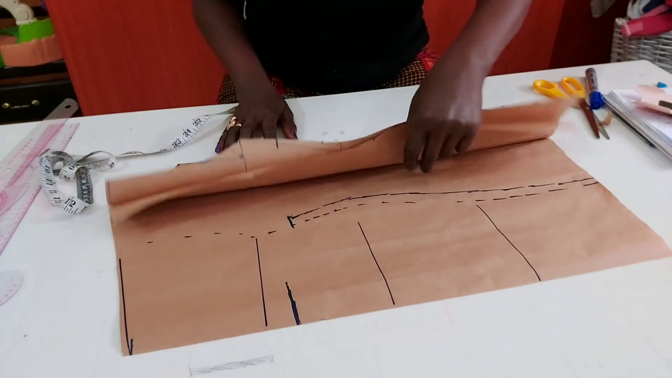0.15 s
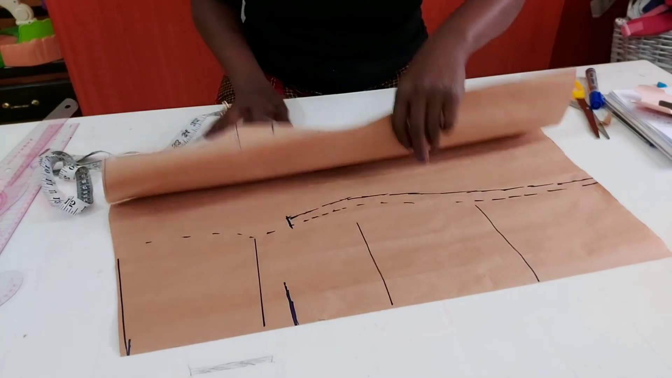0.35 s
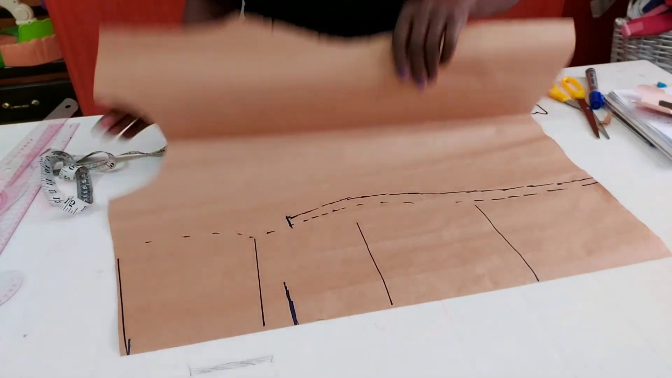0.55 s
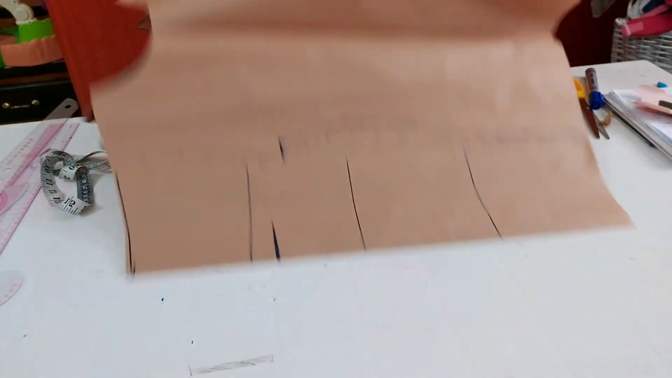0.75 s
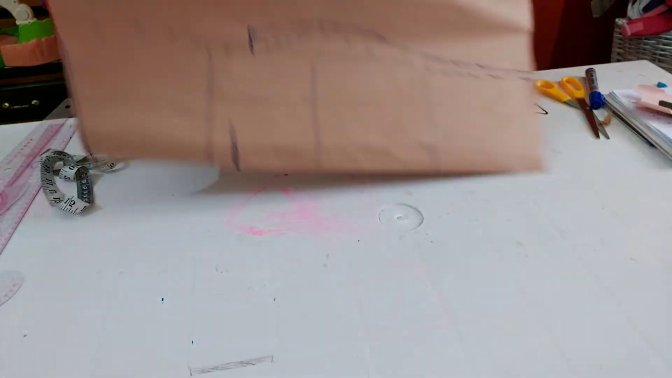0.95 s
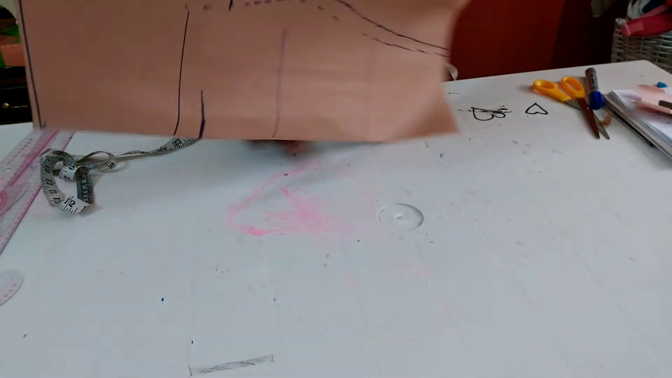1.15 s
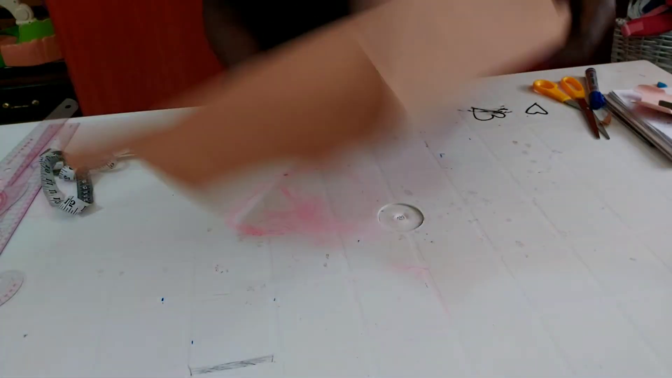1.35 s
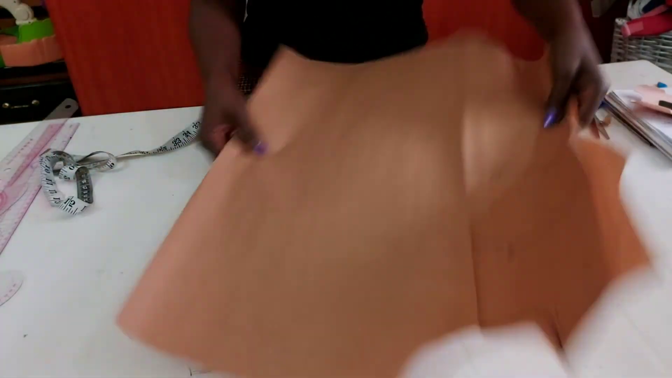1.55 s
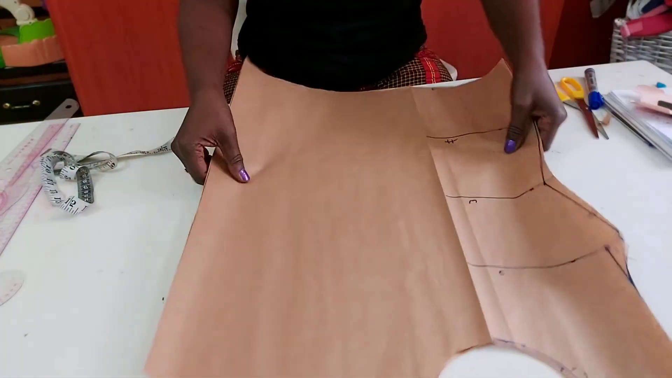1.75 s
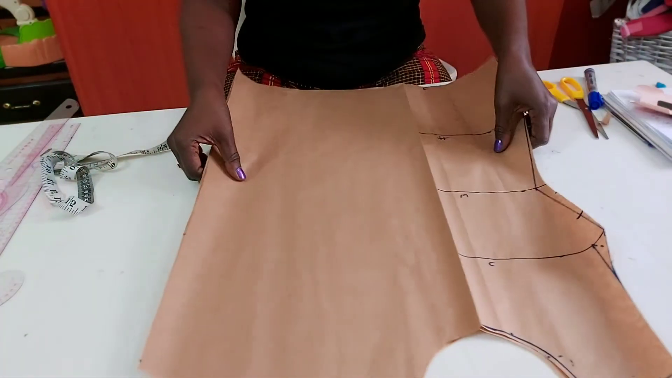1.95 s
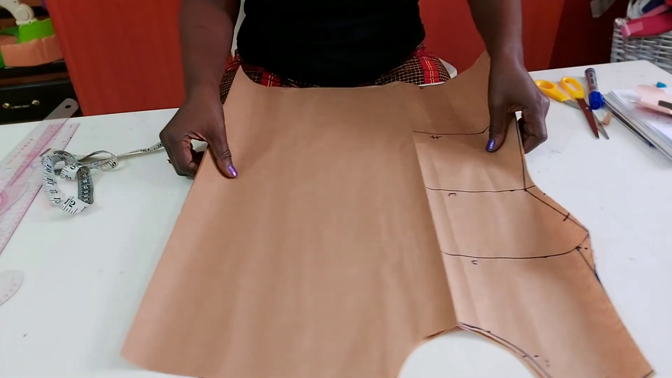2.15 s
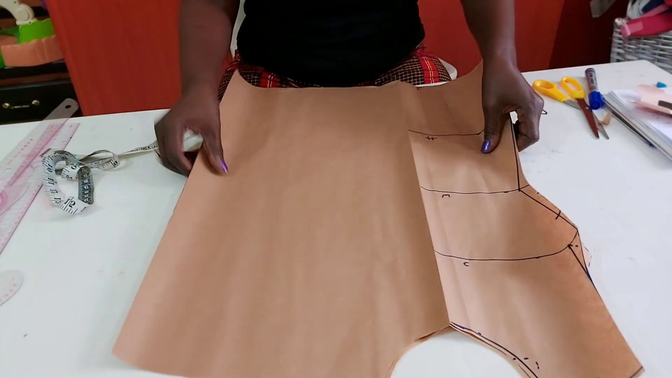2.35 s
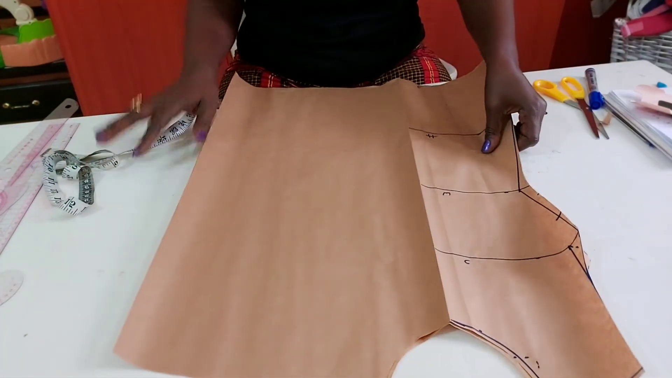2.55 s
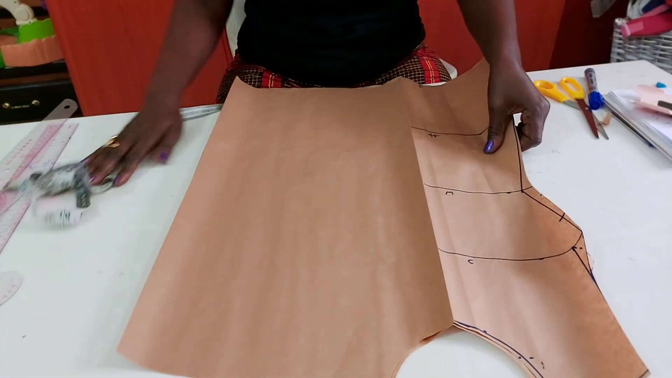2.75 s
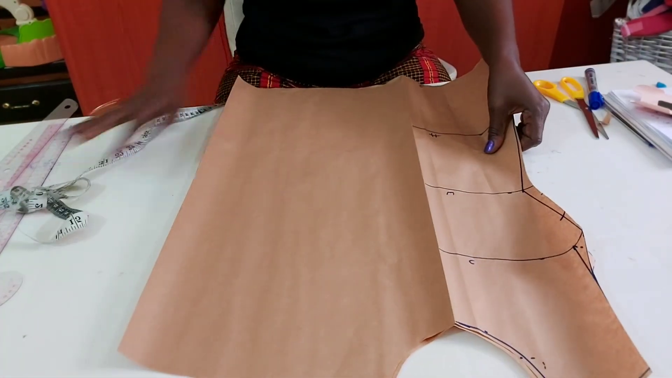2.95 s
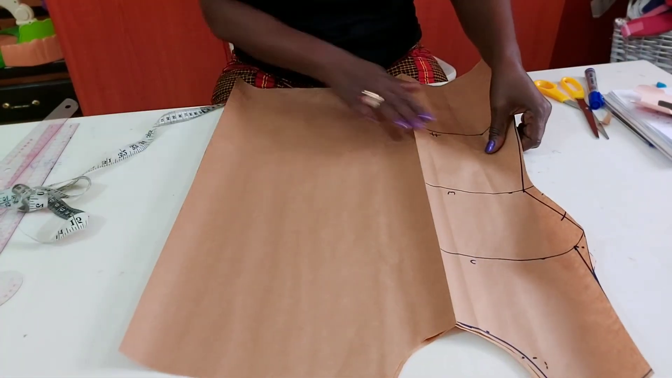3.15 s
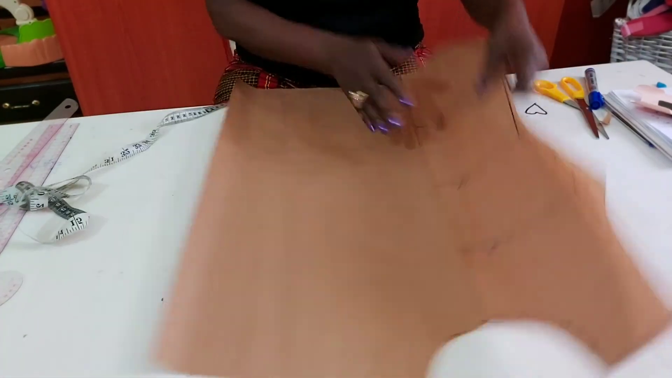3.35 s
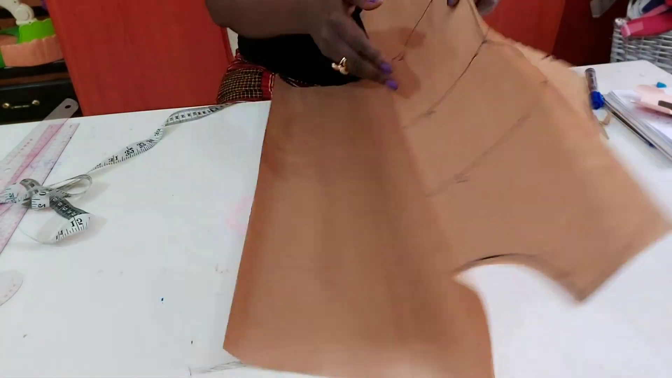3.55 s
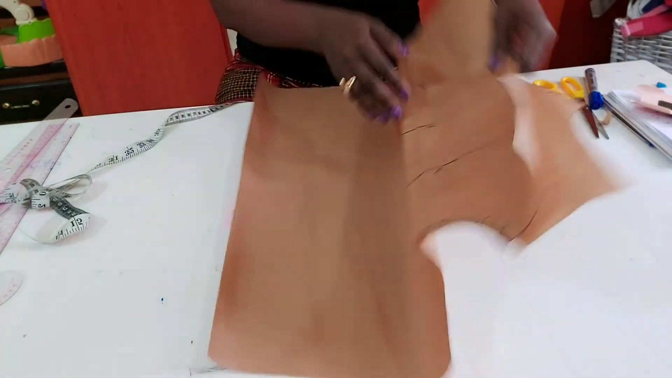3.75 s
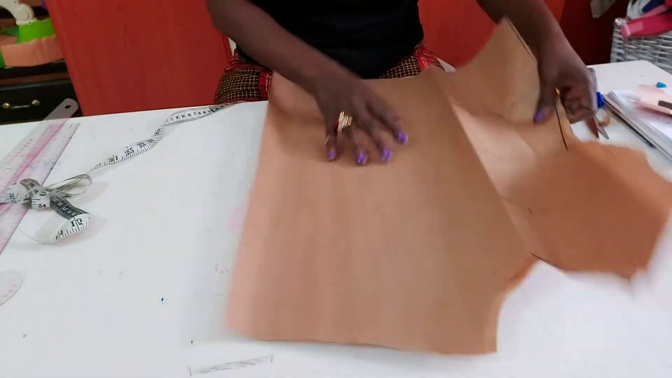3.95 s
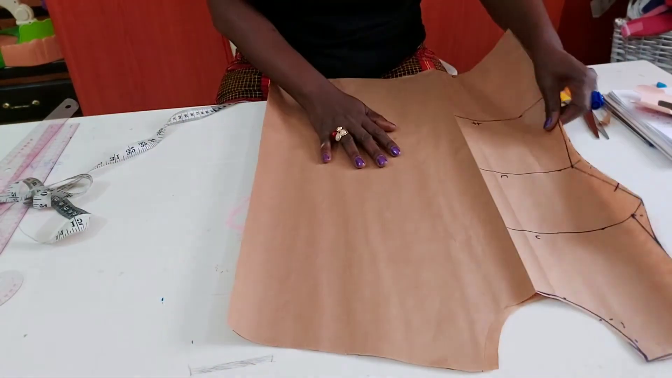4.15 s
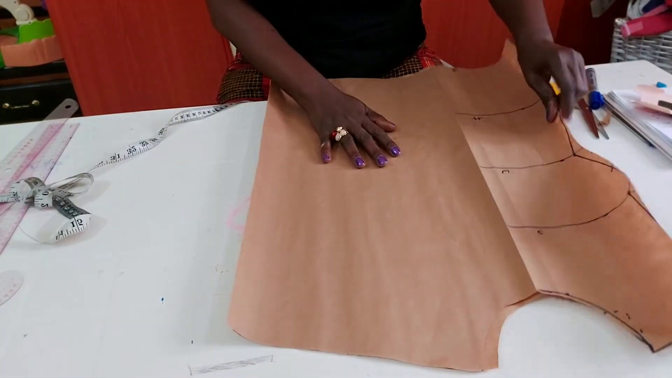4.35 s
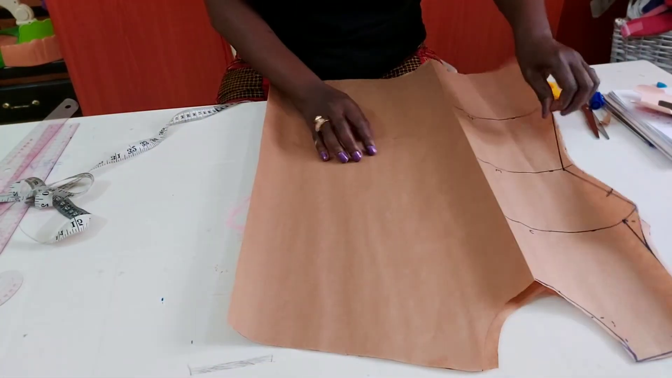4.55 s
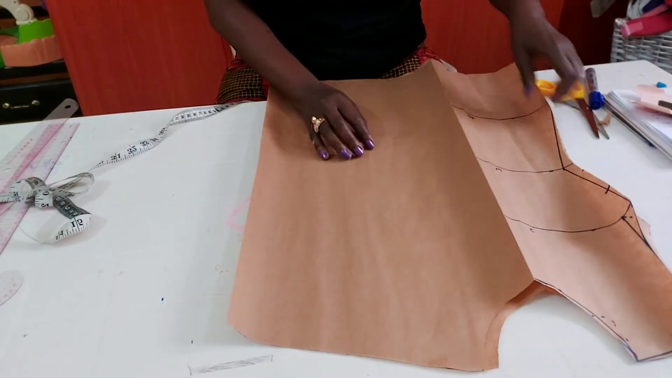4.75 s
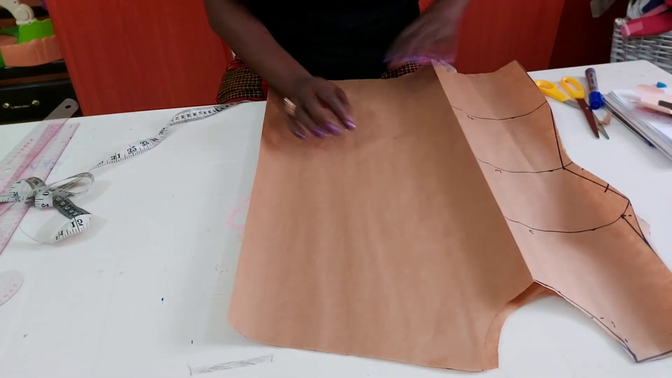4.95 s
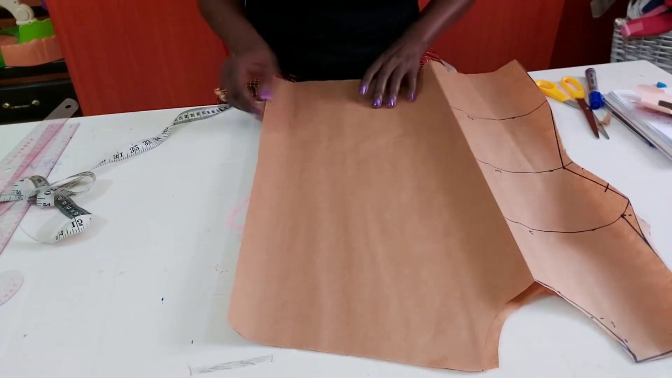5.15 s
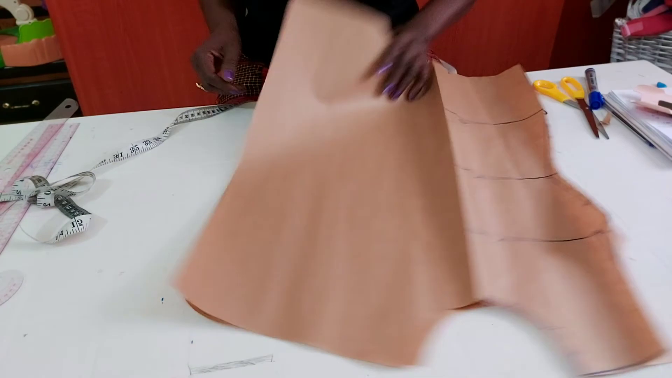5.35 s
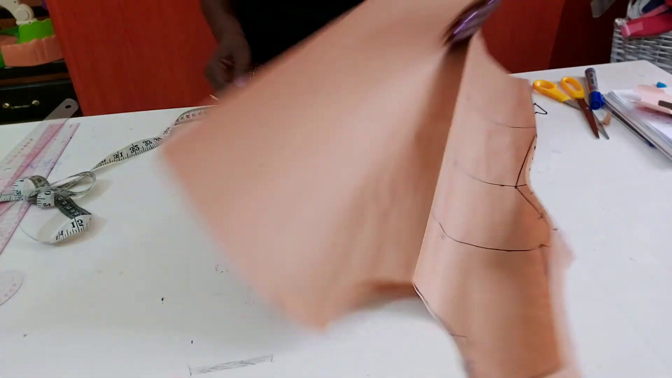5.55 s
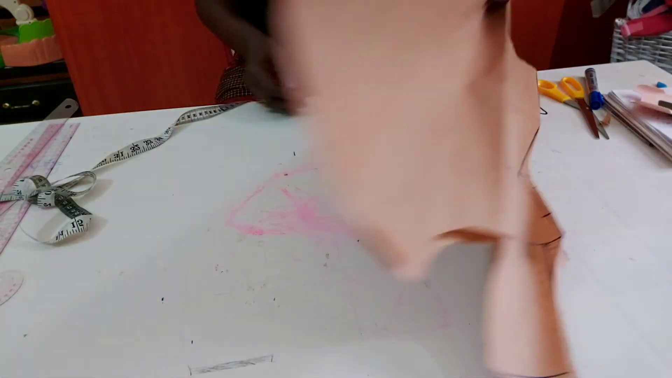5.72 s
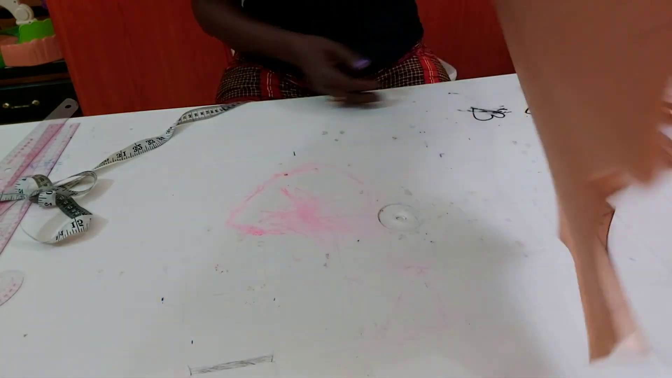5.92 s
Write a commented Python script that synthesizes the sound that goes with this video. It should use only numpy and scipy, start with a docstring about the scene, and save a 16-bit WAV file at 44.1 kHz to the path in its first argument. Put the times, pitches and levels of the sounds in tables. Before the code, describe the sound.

Close, crisp paper handling indoors: rustles, sharp crease pops, low flapping wobble and sliding hiss. Soft woody thuds and low rumbles come from the hollow table beneath. A busy opening is followed by a lull, a second bout of rustling, one tiny metallic nudge of scissors, a short pause, and a final energetic crumple that tapers off. Short room echo.

```python
"""Big stiff paper on a hollow table

A large sheet of stiff paper is lifted, turned and smoothed on a hollow table in a small bare room.
The sheet crackles (clumps of tiny damped waves), slides (noise) and wobbles; creases snap (noise bursts
through resonances). Knocks ring the table top, dragging makes it rumble and drone, and scissors are
nudged once. The walls echo the paper sounds, over faint room air."""
import sys
import numpy as np
from scipy import signal
from scipy.fft import rfft, irfft, next_fast_len
from scipy.io import wavfile
from scipy.ndimage import uniform_filter1d, map_coordinates

SR = 44100
rng = np.random.default_rng(int(sys.argv[2]) if len(sys.argv) > 2 else 0)


def bounce(signal):
    """Save signal as a 16-bit WAV file at the path given by the first command-line argument."""
    frames = np.transpose(np.atleast_2d(signal))
    limited = np.clip(frames, -1, 1)
    pcm = np.round(limited * 32767).astype(np.int16)
    wavfile.write(sys.argv[1], SR, pcm)


N = 263750

# steady room air: f/Hz, level per Hz/dB (relative)
AIR_COLOUR = [(18, -53.5), (30, -9.5), (118, -10), (141, -10), (174, -29), (303, -21.5), (384, -28.5),
              (1190, -38), (2300, -36), (3500, -41), (7670, -42), (10500, -44), (16000, -48)]
AIR_DB = -64.5
# how alike the two ears are: f/Hz, likeness (1 = same)
EAR_LIKENESS = [(60, 0.9), (180, 0.9), (350, .88), (700, 0.7), (1650, 0.1), (15000, 0.04)]
# how long the walls keep echoing: f/Hz, time to fall 60 dB/s
WALL_DECAY = [(200, 0.57), (600, 0.24), (1500, 0.24), (4000, 0.33), (10000, 0.33)]

# ring of the scissors' steel: f/Hz, level/dB (relative), time to fall 60 dB/s
STEEL_RINGS = [(1820, 0.5, 0.3), (2380, -13.5, 1), (3000, -15.5, .2), (3900, -1, .16), (4850, -7, 0.41),
               (5300, -5, 0.34)]
NUDGE_S, NUDGE_DB, BLUR_HZ = 4.752, -49.5, 120  # when, how loud, how fuzzy the ring

# knuckles and the sheet's edge on the table: t/s, level/dB (relative), hardness/dB per octave
THUDS_ON_TABLE = [(0.606, -23, 5), (0.638, -49, 3), (0.698, -16.5, 3), (0.953, -36, 15), (1.757, -21, 9),
                  (1.787, -8.5, 9), (1.817, -26, 5), (2.463, -31.5, 11), (2.481, -40, 11), (2.71, -29, -1),
                  (2.731, -30.5, -10), (2.762, -35, 7), (2.815, -34.5, -7), (2.847, -36, 9),
                  (2.864, -40, -11), (2.985, -62, 31), (3.003, -67, 35), (4.086, -46, 1), (4.159, -24.5, 3),
                  (5.247, -46.5, -7), (5.359, -22.5, 5), (5.494, -27, 18)]
# rings of the table top: f/Hz, level/dB (relative), time to fall 60 dB/s
TABLE_RINGS = [(109.7, -4, 0.12), (143, -14, .1), (188.6, -11.5, 0.25), (336.2, -7, 0.17),
               (378.6, -11, 0.26), (473, -29, 0.069), (524, -15, 0.035), (729, -15.5, 0.069),
               (774, -22, 0.13)]
# hands and sheet dragging: start t/s, rise/s, hold/s, rumble level/dB, drone minus rumble/dB
TABLE_DRAGS = [(.1, 0.03, 0.027, -53, -12), (.36, 0.083, 0.033, -60, -14), (.59, 0.019, 0.12, -46.5, -4),
               (.92, 0.033, .02, -59, -12), (1.4, 0.026, 0.059, -53, -6),
               (1.76, 0.027, 0.095, -43.5, -24.5), (1.9, 0.032, 0.097, -53.5, -6),
               (2.46, .01, .02, -72, -13), (2.705, 0.0052, 0.083, -47, -3), (2.81, 0.011, 0.044, -50, 5),
               (3.42, 0.031, 0.018, -52.5, -19), (3.72, 0.033, 0.042, -59, -19),
               (4.065, 0.028, 0.072, -43.5, 0), (4.44, 0.031, 0.021, -56, -5),
               (4.75, 0.019, 0.075, -80, 13.5), (5.3, 0.038, 0.044, -40.5, -6),
               (5.5, 0.044, 0.094, -49, -4.5)]
# the same drone swelling between drags: t/s, level/dB
DRONE_SWELL = [(0, -54.5), (.3, -53), (.55, -73), (1.1, -66), (2.2, -91.5), (3.0, -70), (3.38, -53.5),
               (3.5, -62), (4.0, -61), (4.9, -74.5), (5.2, -85), (5.98, -66.5)]
# colour of the hollow table's rumble: f/Hz, level per Hz/dB (relative)
HOLLOW_COLOUR = [(15, -57.5), (25, -1.5), (70, 3.5), (101, -9), (123, 3), (238, -9.5), (260, -5.5),
                 (340, -8), (570, -120)]
DRONE_HZ, DRONE_WAVERS_HZ = 108.1, 1.7
SHAKE_DB = -18  # the wobbling sheet shakes the table, relative to the wobble

# creases snapping: t/s, peak level/dB, bright f/Hz, fine minus peak/dB, low pop minus peak/dB,
# low pop f/Hz, left minus right/dB
CREASE_SNAPS = [(0.0153, -36, 4000, -19, -3, 1020, -6), (0.0874, -27, 3650, -20, -0.5, 1040, -2),
                (0.105, -30, 3100, -19.5, -7, 1410, 1), (0.11, -40, 4000, -12, -3, 1000, -1),
                (0.143, -35, 2600, -19, 3.5, 500, 0), (0.1507, -25.5, 3500, -25, 1.5, 1180, -4),
                (0.209, -20.5, 3860, -27.5, -5.5, 1400, -2), (0.217, -17, 3700, -23, -2, 1040, -2),
                (0.2905, -23.5, 5180, -19, -6, 770, -2), (0.3393, -26, 5000, -25, -9, 430, -2),
                (0.3558, -24, 3500, -11, -0.5, 700, 0), (0.423, -23.5, 2600, 0.5, -1.5, 815, -1.5),
                (0.4695, -35.5, 2600, -12, 4, 1400, -5), (0.4938, -44, 4000, -9, -10, 783, -6),
                (0.5319, -26, 3450, -47, -1, 930, -3), (0.555, -34.5, 2560, -17, -3, 506, -4),
                (0.5945, -45, 4010, -12, -1, 840, -7), (0.622, -34, 3500, 6, 0, 401, -3),
                (0.6944, -17, 4030, -9, -4.5, 900, -3), (0.713, -30.5, 3500, -8, 1.5, 503, 1),
                (0.729, -28, 4540, 5, -7, 1800, -4), (0.9462, -33.5, 4500, -4, -12, 1960, -14),
                (0.957, -28, 2820, -15, 0, 1500, 1), (0.9862, -47, 5000, -7, -6, 1500, -1),
                (1.03, -35, 4490, -10, -11, 1500, -3.5), (1.0674, -29, 3800, -16, -0.5, 1800, -2),
                (1.087, -40, 2840, 5, -8, 2070, -3.0), (1.1685, -43, 2570, -21, -3, 1480, 2),
                (1.1772, -30, 2820, -30.5, -7, 1840, -6), (1.207, -42, 2680, -16.5, 0, 2030, 2),
                (1.222, -37, 3145, -22.5, -8, 2130, -10), (1.2463, -36, 3780, -27, -17, 1160, -15),
                (1.259, -34, 3240, -22.5, -10, 2270, -2), (1.2784, -35, 2540, -27, -13, 1286, -3),
                (1.3094, -46, 2546, -16.5, -18, 2500, -1), (1.326, -23.5, 3000, -38, -23, 1330, -5),
                (1.3477, -33, 3060, -26, -18, 450, 1), (1.3792, -31.5, 3130, -23.5, 3.5, 635, -2),
                (1.4214, -12, 4990, -31, -8, 1440, -4), (1.567, -31, 5000, -1.5, -12, 1500, -5),
                (1.587, -35, 5050, -2, -3, 1500, -3), (1.642, -23, 4500, -4, 2, 1670, -2),
                (1.6656, -28, 6000, -0.5, 9, 1750, -6), (1.676, -30, 3020, -13, 3.5, 1400, 1),
                (1.708, -12.5, 3900, -38, -31, 1720, -3.5), (1.7157, -28.5, 4650, -20, 11, 1860, -14),
                (1.719, -22.5, 4350, -27, 6.5, 1900, 11), (1.7684, -28, 5000, -14, -5, 1800, -11),
                (1.891, -24.5, 3950, -29, -2, 1630, 1), (1.9123, -26.5, 6000, -8.5, -20, 1540, -9),
                (2.047, -30, 3800, -25.5, -11.5, 689, -2), (2.1268, -24, 3600, -8.5, -33, 1570, -2.5),
                (2.184, -29.5, 3500, -27, -19, 1450, -7), (2.26, -40, 6000, -11, -10, 1500, -5),
                (2.293, -47, 2520, -20, 2.5, 1500, -3), (2.436, -41, 3130, -29, -6, 781, -6),
                (2.4532, -36.5, 3830, -28, -19, 450, -1), (2.678, -56, 4980, -13, -9, 2000, -7),
                (2.6958, -51.5, 6000, -3, -13.5, 800, -4), (2.7532, -43, 5500, -10, -5, 401, 1),
                (2.926, -42, 2530, -21.5, -11, 2500, 4), (2.987, -34.5, 8000, -27, -32, 748, -1),
                (2.997, -32.5, 6900, -30, -24, 780, -5), (3.2874, -50, 2940, -23, -20, 2460, -6),
                (3.35, -51, 3160, -19, -12, 2170, -4), (3.3607, -36.5, 2900, -26, -10, 2000, -13),
                (3.3779, -26.5, 2950, -10, -24, 1800, -3), (3.406, -23.5, 3750, -8, -9, 1670, -9),
                (3.427, -30, 2500, -8, -15, 2370, 0), (3.439, -24, 3530, -32, -20, 1810, -9),
                (3.4563, -23.5, 3900, -15, -10, 1600, -6), (3.4868, -25, 2500, -20, 0, 1900, -9),
                (3.6054, -22, 3600, -36, -19, 1440, -4), (3.6594, -26.5, 2500, -19, -1.5, 2290, 3),
                (3.621, -27, 3200, -22, -5.5, 2300, -2), (3.673, -26.5, 2700, -14, -10, 2300, -3),
                (3.702, -43, 2560, -20, -25, 2050, -6), (3.632, -34, 4000, -18, -5, 2000, -4),
                (3.7166, -22.5, 3730, -10, -15, 2500, -5), (3.727, -17, 2990, -7.5, -10, 1280, 1),
                (3.745, -24.5, 2960, -14, -2.5, 1200, 1), (3.7657, -25, 2490, -21, -18.5, 1640, -8),
                (3.8113, -31, 4000, -14, -7, 1680, -14.5), (3.82, -27.5, 3000, -15, -5, 1700, -7),
                (3.866, -25, 5770, -26, -7, 2130, -8), (3.881, -30, 3210, -18.5, 5, 1620, -3),
                (3.9033, -19, 4440, -24, -5, 1220, -1.5), (3.912, -29, 2600, -12.5, -1, 1500, -3),
                (3.97, -26, 2600, -25, -14, 1900, -8), (3.998, -28, 6290, -16.5, 1.5, 1460, -7),
                (4.0748, -20, 2700, -16, -22.5, 1700, -4), (4.1097, -25, 3590, -9, -10.5, 2070, -2),
                (4.1485, -29, 2970, 9, 0.5, 635, -0.5), (4.2278, -20.5, 4730, -31.5, -32, 1990, -4),
                (4.251, -33.5, 4170, 1.5, -1.5, 2080, -1.5), (4.2913, -20.5, 3370, -28, -14, 2200, -8),
                (4.4355, -23, 5960, -1.5, -5.5, 1960, 0.5), (4.484, -26, 3100, 3, -13, 1960, 3),
                (4.503, -22, 3680, 0.5, -29, 1880, -2), (4.556, -29, 3520, -21, -3, 2060, 9),
                (4.573, -28, 3500, -2.5, -14, 1600, 3), (4.6018, -31, 3000, -1.5, -18, 2010, 9),
                (4.7515, -26, 3900, -40, -49, 1800, -2), (5.204, -46, 4700, -21, -10, 2280, -11),
                (5.2531, -25, 2700, -27, -2, 2330, 2), (5.277, -41, 2620, -26, -16, 538, 4),
                (5.318, -26, 3030, -24, -17, 1920, -4), (5.3384, -19.5, 3430, -30, -15, 926, -3),
                (5.3445, -19, 3500, -13, -11, 2000, 0), (5.372, -27.5, 2500, -15, 4, 500, 0),
                (5.393, -35, 2600, -15, 4, 500, 0), (5.421, -30.5, 3000, -20, 6.5, 900, 0),
                (5.427, -19, 3670, -15, -16, 710, -3), (5.468, -31, 3000, -15, 6.5, 500, 0),
                (5.512, -29, 2600, -15, 5, 1800, 1), (5.565, -22, 2500, -15, -2, 1000, 5),
                (5.4965, -16.5, 3720, -21, -3.5, 645, 1), (5.5266, -18.5, 4720, -6, -5, 1350, 2),
                (5.6116, -25.5, 2510, -20, 4, 1400, 9), (5.642, -18.5, 2620, -35, -4.5, 1550, 0.5),
                (5.712, -36, 4000, -17.5, -2, 740, -6), (5.7158, -28.5, 3960, -23, 5.5, 1300, 0),
                (5.723, -36.5, 7000, -5, -8, 2000, -2), (5.744, -28, 4000, -15, -10, 1750, -2),
                (5.789, -37, 4500, -6, 7, 1300, -3), (5.8077, -38.5, 3140, -23, 6.5, 1900, -5),
                (5.8675, -38, 2690, -8, 8.5, 2080, -3), (5.8872, -35, 3520, -2, 5.5, 1700, -8),
                (5.9103, -34.5, 4000, -10, 7.5, 1850, -8), (5.921, -34, 5000, -9, 6, 1900, -2),
                (5.972, -40, 5000, -8, -3, 2000, -4)]
SNAP_RISE_MS, SNAP_T60_MS = 0.33, 14  # rise time constant, time to fall 60 dB
FINE_HZ = 7220
CLICK = 5  # first break of a crease, added to noise of rms about 1

# where the sheet is: t/s, delay of the left ear/ms, left minus right/dB
SHEET_PLACE = [(0, -0.028, -1), (.7, -0.021, -1.5), (1.2, -0.088, -1), (1.7, -0.22, -1.5),
               (2.2, -0.23, -0.5), (2.7, -0.29, -3.5), (3.2, -0.046, -1), (3.7, 0.028, 0), (4.2, 0.032, -1),
               (4.7, 0.29, -2.5), (5.2, 0.078, -2), (5.98, -0.074, -2.5)]
# pushes, pulls and flaps: start t/s, rise/s, hold/s, crackle level/dB,
# then fine crackle, wobble and airy hiss, each minus crackle/dB
SHEET_MOVES = [(-.02, 0.013, 0.016, -46, -4, -6, -10.5), (.06, 0.016, 0.1, -47, -7.5, -5, -10.5),
               (.2, 0.0066, 0.081, -45.5, -1, -2.5, -20), (.33, 0.014, 0.0098, -37.5, -9, -7, -19),
               (.39, 0.041, 0.064, -44, -3.5, -5, -14.5), (.58, 0.048, 0.02, -35, -4.5, -0.5, -18),
               (.68, 0.013, 0.047, -36, -3, -2, -9.5), (.8, 0.0077, 0.11, -42, -9.5, -3.5, -10.5),
               (.88, 0.029, 0.085, -43, -10, -2.5, -32), (1.0, 0.024, 0.17, -48, -6, -5, -17),
               (1.22, 0.025, 0.054, -47, -5, -8, -12), (1.32, 0.029, 0.028, -36.5, -9, -4, -35),
               (1.415, 0.0063, 0.019, -28.5, -4, -6.5, -29), (1.495, 0.019, 0.042, -39, -5.5, 1, -17),
               (1.57, 0.014, 0.043, -36, -20, -6.5, -15.5), (1.63, 0.011, 0.036, -31.5, -11.5, -6.5, -27.5),
               (1.7, 0.0083, 0.077, -38.5, -14, -4.5, -14.5), (1.785, 0.005, 0.046, -41, -10, 5, -23),
               (1.88, 0.035, 0.058, -39.5, -6.5, -9, -14.5), (2.125, 0.016, 0.051, -52, -8, -17, -11),
               (2.17, 0.036, 0.047, -55, -7, -17, -9.5), (2.27, 0.016, 0.11, -64.5, -3, -11, -15),
               (2.425, 0.011, 0.014, -54.5, -10, -14, -23), (2.458, 0.0078, 0.02, -62, -21, 13.5, -11),
               (2.675, .005, .02, -83, 8, -11, -1), (2.7, 0.035, 0.11, -59.5, -2, 4.5, -2),
               (2.8, 0.039, 0.13, -63.5, -2.5, -2.5, -1), (2.985, 0.011, 0.029, -54, -6, -11, -11),
               (3.283, 0.0059, 0.014, -69, -6.5, -11, -7.5), (3.34, 0.017, 0.065, -43.5, -15.5, -14.5, -38),
               (3.42, 0.028, 0.077, -37, -8.5, -8, -8), (3.56, 0.012, 0.086, -41.5, -6.5, -3, -28),
               (3.71, 0.015, 0.1, -41, -5.5, -4, -15), (3.86, 0.021, 0.04, -38, -2, -4, -15.5),
               (3.96, 0.005, 0.051, -36.5, -20.5, -18, -17), (4.06, 0.022, 0.027, -32, -10.5, -11.5, -17.5),
               (4.14, 0.0042, 0.034, -44.5, -3.5, 3.5, 0.5), (4.26, 0.019, 0.028, -35.5, -8, -7, -15),
               (4.43, 0.013, 0.078, -40.5, -7.5, -10.5, -7.5), (4.54, 0.01, 0.026, -38.5, -6, -18, -20),
               (4.748, 0.0072, 0.035, -63.5, 9.5, -38.5, -22), (5.195, 0.019, 0.036, -62, -5.5, -20, -2.5),
               (5.245, 0.0057, 0.047, -40, -4.5, -5.5, -25), (5.33, 0.0075, 0.065, -40.5, -1.5, -2.5, -6.5),
               (5.415, 0.0069, 0.095, -36, 1.5, -2, -17), (5.46, 0.012, 0.028, -35.5, 0, 4, -18),
               (5.495, 0.013, 0.081, -33.5, -3, -2.5, -16), (5.6, 0.008, 0.11, -44, -21, -4.5, -12),
               (5.71, 0.0093, 0.023, -49, -5.5, -5, -25), (5.785, 0.019, 0.065, -49.5, -10, 1.5, -19),
               (5.862, 0.0067, 0.044, -44, -5, -1, -23), (5.93, 0.025, .06, -47.5, -1, -3, -24)]
# level of the upper crackle over the lower: t/s, level/dB
UPPER_CRACKLE = [(0, -3.5), (.2, 2.5), (.4, -11), (.6, -6), (.72, -11.5), (.9, -1.5), (1.15, -17),
                 (1.35, -2), (1.43, -2.5), (1.52, 0), (1.64, 0), (1.72, -10), (1.8, 2), (1.95, -4.5),
                 (2.13, -10.5), (2.3, -11), (2.5, -1.5), (2.72, -13), (2.9, -1.5), (3.05, -8.5),
                 (3.38, -3.5), (3.47, -2), (3.6, -7.5), (3.75, 5.5), (3.9, -8), (4.0, -9), (4.1, -6),
                 (4.3, -3), (4.45, 2.5), (4.6, -8.5), (4.8, -8.5), (5.25, -1), (5.4, -4.5), (5.55, -3.5),
                 (5.7, -2), (5.85, -3), (5.98, -0.5)]
# colour of the paper: f/Hz, level per Hz/dB (relative)
PAPER_COLOUR = [(120, -32), (200, -2.5), (249, -18.5), (328, -1), (360, -3), (548, -4), (671, -5.5),
                (867, -5), (2050, -1.5), (2860, -3.5), (8120, -9), (14900, -20.5), (16000, -30)]
# moving resonances of the bent sheet: t/s, upper f/Hz, lower f/Hz
SHEET_BEND = [(0, 1757, 680), (.5, 1670, 560), (.7, 1994, 421), (1.0, 1517, 511), (1.45, 1560, 618),
              (1.52, 1490, 694), (1.6, 1525, 896), (1.68, 1345, 902), (1.74, 1950, 691), (1.82, 1817, 365),
              (2.0, 2287, 486), (2.13, 3570, 760), (2.31, 1880, 805), (2.5, 1533, 501), (2.72, 2670, 366),
              (3.0, 2230, 774), (3.38, 2450, 603), (3.55, 1937, 697), (4.0, 1683, 860), (4.09, 2540, 663),
              (4.2, 2080, 422), (4.3, 2250, 660), (4.7, 2110, 777), (4.78, 1800, 700), (5.25, 2480, 528),
              (5.4, 2204, 550), (5.47, 1522, 486), (5.5, 1505, 620), (5.56, 1986, 800), (5.61, 1427, 795),
              (5.98, 1726, 675)]
BODY_LO_HZ, BODY_HI_HZ = 990, 2010  # range of the lower crackle
LIFT_DB = 12  # how far the bent sheet's resonances stand out
UNEVEN_DB = 1.2  # the crackle comes in fits and starts
RISE_DB, FADE_DB_PER_S = 14.5, 177.5  # a move or drag swells by this much, then dies away

LOW_CUT_HZ, TOP_HZ = 106, 16400  # bass and treble limits of the sound
EARS = np.array([[1], [-1]])  # left and right sign


def amp(db):
    """Turns dB into a plain gain."""
    return 10 ** (np.asarray(db) / 20)


def unit(x):
    """Scales to an rms of 1."""
    return x / np.sqrt(np.mean(x ** 2) + 1e-20)


def along(points, hz):
    """Reads (Hz, value) points on a log frequency axis."""
    f, v = np.transpose(points)
    return np.interp(np.log(hz + 1), np.log(f + 1), v)


def curves(rows):
    """One value per sample for each column after the time."""
    s, *cols = np.transpose(rows)
    return [np.interp(np.arange(N) / SR, s, c) for c in cols]


def wander(rate):
    """A smooth random curve with this many knots a second."""
    knots = rng.standard_normal(int(N * rate / SR) + 4)
    return map_coordinates(knots, [np.arange(N) * rate / SR])


def swells(rows):
    """Rise, hold and fade of each row, added as power: gains for the level and each part relative to it."""
    start, rise, hold, db, *parts_db = np.transpose(rows)[:, :, None]
    t = np.arange(0, N, 32) / SR
    rising = RISE_DB * np.clip(1 - (t - start) / rise, 0, None)
    fading = FADE_DB_PER_S * np.clip(t - start - rise - hold, 0, None)
    shape_db = db - rising - fading
    gains = []
    for part_db in [0, *parts_db]:
        power = np.sum(amp(np.maximum(shape_db + part_db, -200)) ** 2, axis=0)
        gains.append(np.interp(np.arange(N) / SR, t, np.sqrt(power)))
    return gains


def filtered(x, response):
    """Shapes the spectrum of x with a response of frequency."""
    m = next_fast_len(x.shape[-1] + 8192)
    spectrum = rfft(x, m) * response(np.fft.rfftfreq(m, 1 / SR))
    return irfft(spectrum, m)[..., :x.shape[-1]]


def paired(pair):
    """Mixes two unrelated signals so that the ears share the bass but hardly the treble."""
    def mix(hz):
        turn = np.arccos(np.clip(along(EAR_LIKENESS, hz), -1, 1)) / 2
        return np.array([np.cos(turn), np.sin(turn)])
    mid, side = filtered(pair, mix)
    return np.array([mid + side, mid - side])


def whitened(x):
    """Flattens the long-term spectrum."""
    m = next_fast_len(N)
    z = rfft(x, m)
    power = uniform_filter1d(np.abs(z) ** 2, 1500, axis=1)
    return irfft(z / np.sqrt(power + 1e-9), m)[:, :N]


def room_air():
    """Steady stereo noise with the colour of the room's air."""
    air = paired(rng.standard_normal((2, N)))
    return amp(AIR_DB) * unit(filtered(air, lambda hz: amp(along(AIR_COLOUR, hz))))


def room(x):
    """A diffuse echo builds in about 10 ms; a fresh random tail is drawn every 0.2 s."""
    hop, out = SR // 5, np.zeros((2, N + 2 * SR))
    for start in range(0, N, hop):
        # fading noise stands for the many wall reflections
        hz, t, z = signal.stft(rng.standard_normal((2, SR // 2)), SR, nperseg=256)
        fade = amp(-60 * t / along(WALL_DECAY, hz)[:, None])
        tail = signal.istft(z * fade, SR, nperseg=256)[1]
        tail_s = np.arange(tail.shape[1]) / SR
        tail = paired(tail * (1 - np.exp(-(tail_s / .008) ** 2)))
        tail = tail / np.linalg.norm(tail[0])
        echo = signal.fftconvolve(x[:, start:start + hop], tail, axes=1)
        out[:, start:start + echo.shape[1]] += echo
    return out[:, :N]


def scissors():
    """A nudge leaves a fuzzy ring of loose blades: tones whose strength varies at random as they fade."""
    out, t = np.zeros((2, N)), np.arange(SR // 2) / SR
    for hz, db, t60 in STEEL_RINGS:
        blur = filtered(rng.standard_normal((2, 2, len(t))), lambda f: 1 / (1 + (f / BLUR_HZ) ** 2))
        ring = unit(blur[0] * np.sin(2 * np.pi * hz * t) + blur[1] * np.cos(2 * np.pi * hz * t))
        fade = amp(NUDGE_DB + db - 60 * t / t60) * (1 - np.exp(-t / .006))
        out[:, round(NUDGE_S * SR):][:, :len(t)] += fade * ring
    return out


def table_drags():
    """Dragging, and the wobbling sheet, rumble the hollow table; its low drone is nearly alike at both ears."""
    dragging, ringing = swells(TABLE_DRAGS)
    wobbling = swells(SHEET_MOVES)[2]
    drone_hz = DRONE_HZ + DRONE_WAVERS_HZ * wander(14.0)
    phase = 2 * np.pi * np.cumsum(drone_hz) / SR + .2 * wander(6) * EARS
    drone_level = np.hypot(ringing, amp(curves(DRONE_SWELL)[0]))
    drone = np.sqrt(2) * drone_level * np.sin(phase)  # a sine of rms 1 times the level
    one, other = rng.standard_normal((2, N))
    rumble = np.array([one + 0.41 * other, one - 0.07 * other])
    rumble = unit(filtered(rumble, lambda hz: amp(along(HOLLOW_COLOUR, hz))))
    return drone + np.hypot(dragging, amp(SHAKE_DB) * wobbling) * rumble


def table_thuds():
    """Soft blows ring the hollow top at its own pitches; harder blows favour the higher ones."""
    out, t = np.zeros(N + SR), np.arange(SR // 2) / SR
    for s, db, hard_db in THUDS_ON_TABLE:
        ring = np.zeros(len(t))
        for hz, level, t60 in TABLE_RINGS:
            ring_db = level + hard_db * np.log2(hz / 330) + rng.normal(0, 0.88)
            ring += amp(ring_db - 60 * t / t60) * np.sin(2 * np.pi * hz * t)
        soft_start = 1 - np.exp(-t / 0.002)
        out[round(s * SR):][:len(t)] += amp(db) / 3 * ring * soft_start
    return out[:N]


def snaps():
    """A crease gives way in a burst of splinters that excites a bright, a fine and a low sheet resonance."""
    size, early = 4096, 16  # samples; the early ones leave room for the leading ear
    out, t, hz = np.zeros((2, N + SR)), np.arange(size) / SR, np.fft.rfftfreq(size, 1 / SR)
    place_s, lag_ms, _ = np.transpose(SHEET_PLACE)
    ms = t * 1000
    fade = amp(-60 * np.minimum(ms / SNAP_T60_MS, 3)) * (t < .08) * (1 - np.exp(-ms / SNAP_RISE_MS))
    for s, db, bright_hz, fine_db, pop_db, pop_hz, pan_db in CREASE_SNAPS:
        shared, left, right = rng.standard_normal((3, size))
        shared[round(SNAP_RISE_MS * SR / 1000)] += CLICK * np.sign(shared[0])
        burst = rfft(fade * (shared + .5 * np.array([left, right])))
        lag = np.exp(-1j * np.pi * hz * np.interp(s, place_s, lag_ms) / 1000 * EARS)
        parts = ((bright_hz, 1.3, 0), (FINE_HZ, 1.8, fine_db), (pop_hz, 1.3, pop_db))
        for centre, q, part_db in parts:
            width = 1j * hz * centre / q
            ring = width / (centre ** 2 - hz ** 2 + width)
            soften = (1 + 1j * hz / (2.2 * centre)) ** 2
            part = np.roll(irfft(burst * ring * lag / soften), early, axis=1)
            part = part / np.abs(part).max(axis=1, keepdims=True)
            out[:, round(s * SR):][:, :size] += amp(db + part_db + pan_db * EARS / 2) * part
    return out[:, early:N + early]


def bursts(s, hz, cycles, gain, spread_ms, size):
    """Short damped vibrations, each from its own spot on the sheet."""
    draw = rng.standard_normal((len(s), 2))
    place_s, lag_ms = np.transpose(SHEET_PLACE)[:2]
    lag = (np.interp(s, place_s, lag_ms) + spread_ms * draw[:, 0]) * SR / 2000  # half for each ear
    out = []
    for side in (1, -1):
        start = s * SR + side * lag
        first = np.floor(start).astype(int)
        turns = (np.arange(size) + 1 - (start - first)[:, None]) * hz[:, None] / SR
        wave = np.sin(2 * np.pi * turns) * np.exp(-turns / cycles)
        wave = wave * np.sign(draw[:, 1:]) * gain[:, None]
        at = np.clip(first[:, None] + np.arange(size), 0, N)
        out.append(np.bincount(at.ravel(), wave.ravel(), N + 1)[:N])
    return np.array(out)


def crackle(count, mid_hz, octaves, tail_db, cycles, size):
    """Tiny buckles in clumps: random times, pitches and sizes, a few of them larger; rms 1."""
    draw = rng.random((count, 4))
    clumps = count // 5
    clump = rng.random(clumps)[(draw[:, 0] * clumps).astype(int)]
    s = clump * N / SR + .01 * draw[:, 1]
    hz = np.clip(mid_hz * 2 ** (octaves * (2 * draw[:, 2] - 1)), 100, 15000)
    gain = amp(-tail_db * np.log(draw[:, 3] + .02))
    return unit(bursts(s, hz, cycles, gain, spread_ms=0.17, size=size))


def bent(x, column, octaves, patchy_db):
    """A resonance of the bent sheet moves as it is handled; random patches make the colour uneven."""
    hz, t, z = signal.stft(x, SR, nperseg=512)
    s, centre_hz = np.transpose(SHEET_BEND)[[0, column]]
    away = np.log2((hz[:, None] + 1) / np.interp(t, s, centre_hz)) / octaves
    patches = uniform_filter1d(rng.standard_normal(z.shape[1:]), 4, 0)
    patches = unit(uniform_filter1d(patches, 8, 1))
    gain = amp(LIFT_DB * (np.exp(-away ** 2 / 2) - 3.0) + patchy_db * patches)
    return signal.istft(z * gain, SR, nperseg=512)[1][:, :N]


def register(x, lo_hz, hi_hz):
    """One range of the paper's colour, rms 1."""
    def colour(hz):
        edges = (1 + (lo_hz / (hz + 1)) ** 6) * (1 + (hz / hi_hz) ** 6)
        return amp(along(PAPER_COLOUR, hz)) / np.sqrt(edges)
    return unit(filtered(x, colour))


def sheet():
    """Crackle over the hiss of paper sliding on the table; the large sheet wobbles low."""
    crackling, fizzing, wobbling, brushing = swells(SHEET_MOVES)
    slide = rng.standard_normal((2, N))
    small = crackle(count=9000, mid_hz=4000, octaves=1.9, tail_db=1.7, cycles=1.5, size=96)
    large = crackle(count=2400, mid_hz=550, octaves=1.134, tail_db=1.2, cycles=2.2, size=900)
    small, large = unit(whitened(small)), unit(whitened(large))
    grain = bent(small + 0.9 * slide, column=1, octaves=1.0, patchy_db=2.5)
    flap = bent(large + 1.17 * paired(slide), column=2, octaves=0.9, patchy_db=1.0)

    lower = amp(UNEVEN_DB * wander(22)) * register(grain, BODY_LO_HZ, BODY_HI_HZ)
    upper = amp(UNEVEN_DB * wander(22)) * register(grain, BODY_HI_HZ * 1.3, 4600)
    upper = amp(curves(UPPER_CRACKLE)[0]) * upper
    middle = crackling * (lower + upper) / np.sqrt(2)
    fine = fizzing * register(grain, 5400, 9500)
    airy = brushing * register(.4 * grain + slide, 10500, 18000)
    low = wobbling * register(flap, 210, 1700)
    return (middle + fine + airy + low) * amp(curves(SHEET_PLACE)[1] * EARS / 2)


def scene():
    """Paper and its echo (duller than the direct sound), table, scissors and room air."""
    paper, creases = sheet(), snaps()
    send = amp(-8) * paper + amp(-3) * creases
    echo = filtered(room(send), lambda hz: 1 / (1 + 1j * hz / 6000))
    return room_air() + echo + scissors() + table_drags() + table_thuds() + creases + paper


def record(dry):
    """The deepest bass is dropped and the sound ends at TOP_HZ."""
    def response(hz):
        bass_cut = (1j * hz / (LOW_CUT_HZ + 1j * hz)) ** 2
        return np.clip((TOP_HZ - hz) / 600, 0, 1) * bass_cut
    return filtered(dry, response)


dry = scene()
out = record(dry)
bounce(out)
```